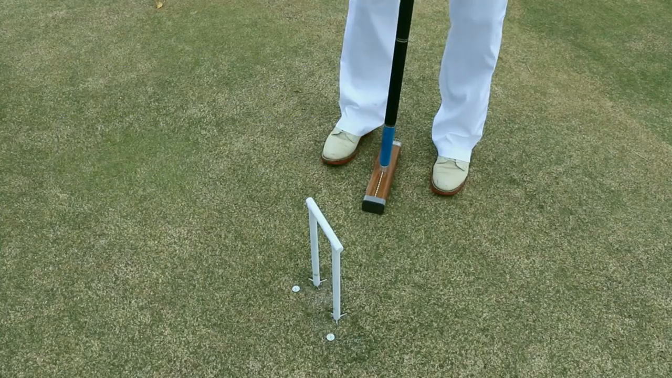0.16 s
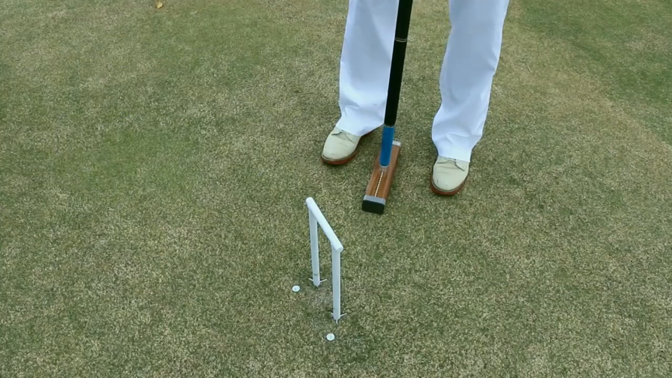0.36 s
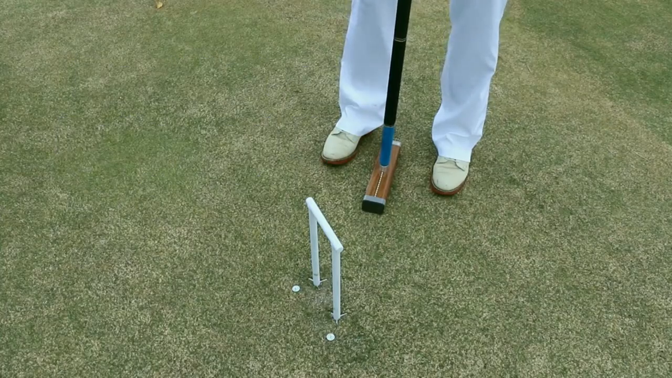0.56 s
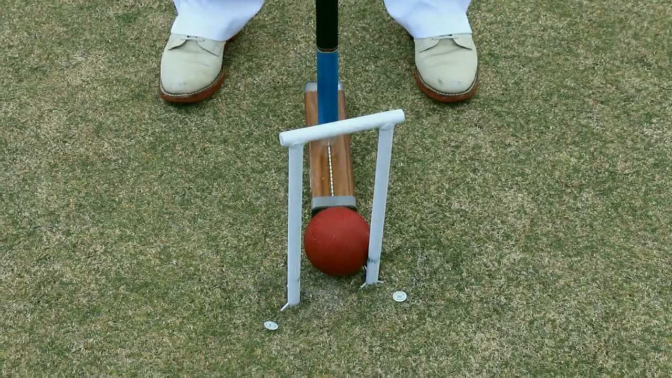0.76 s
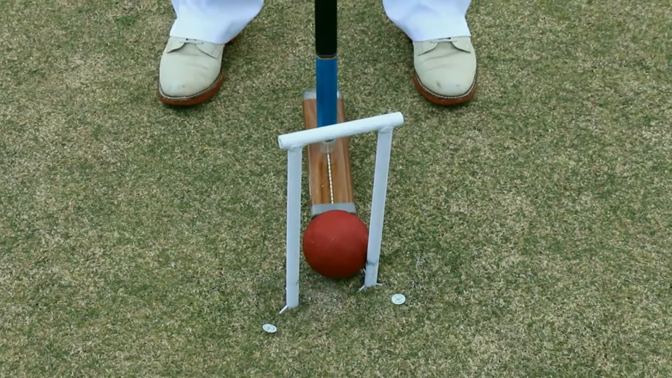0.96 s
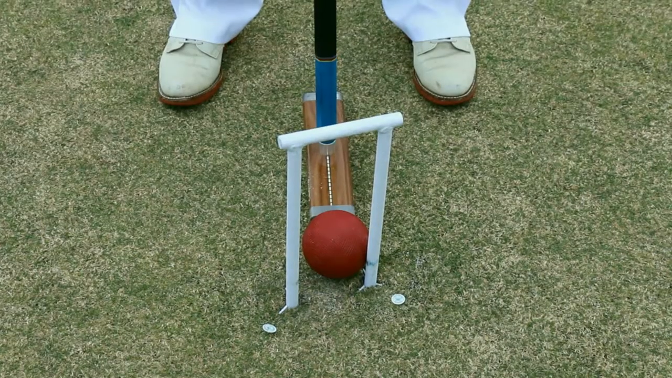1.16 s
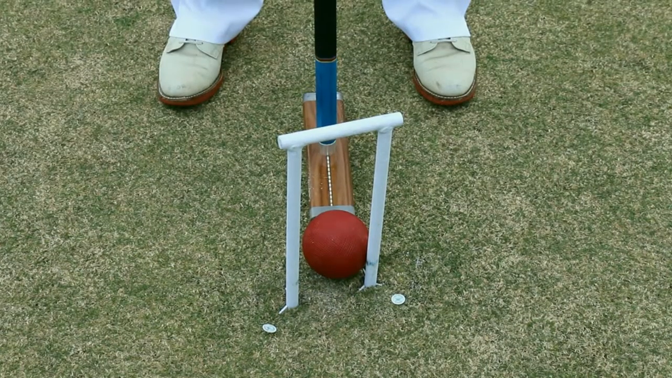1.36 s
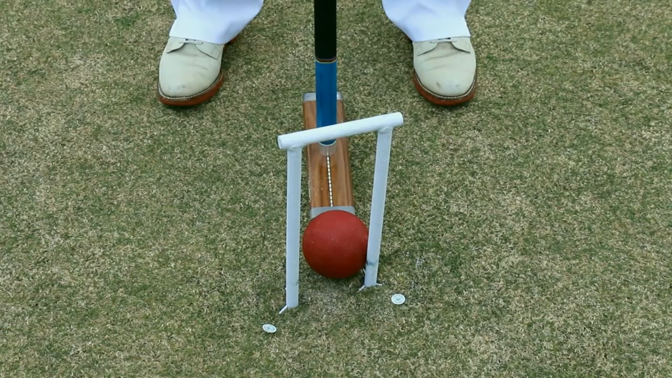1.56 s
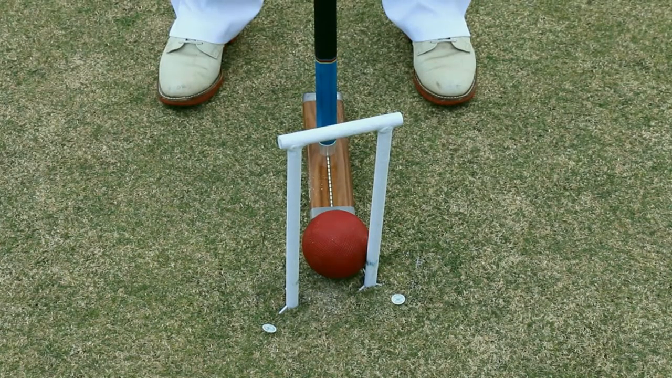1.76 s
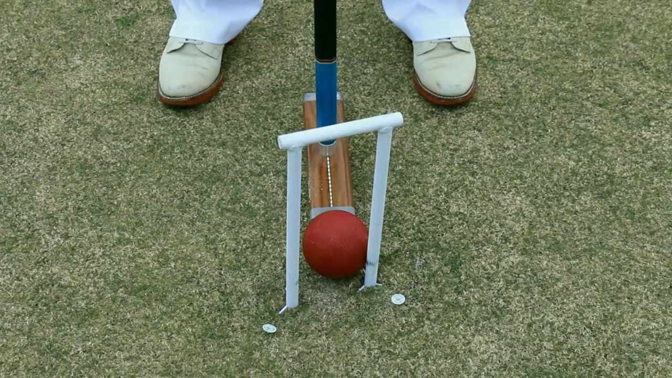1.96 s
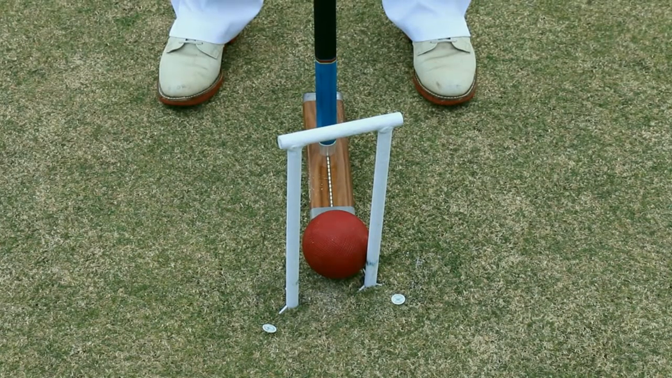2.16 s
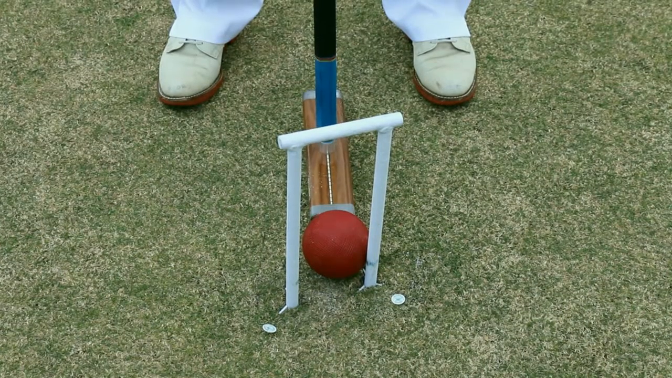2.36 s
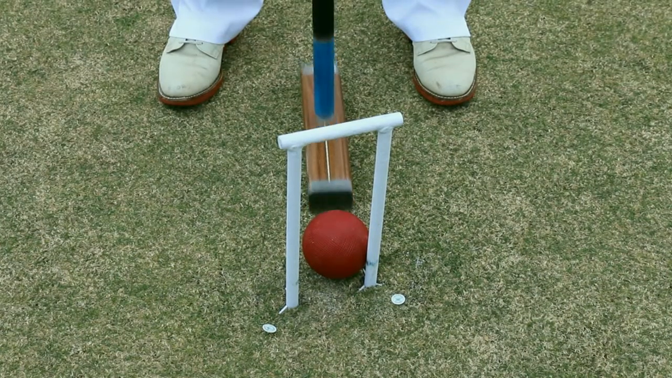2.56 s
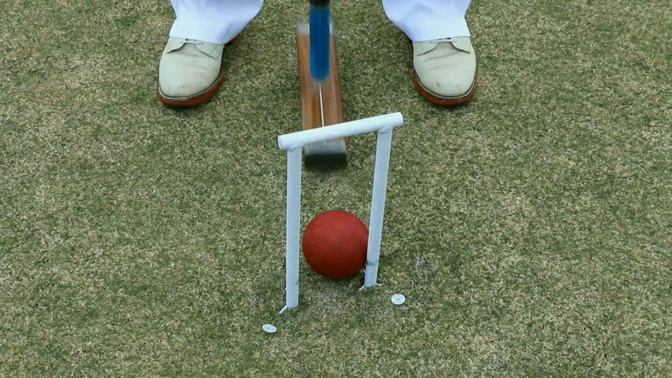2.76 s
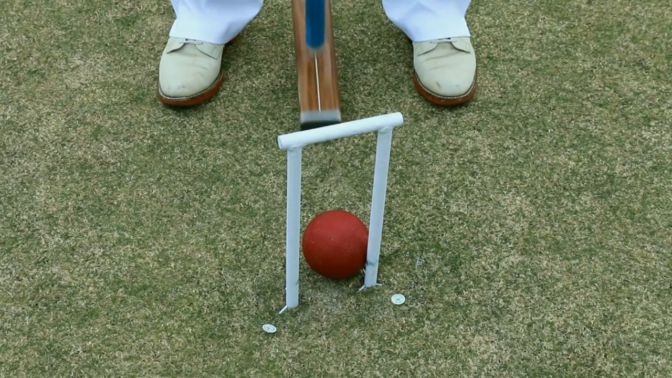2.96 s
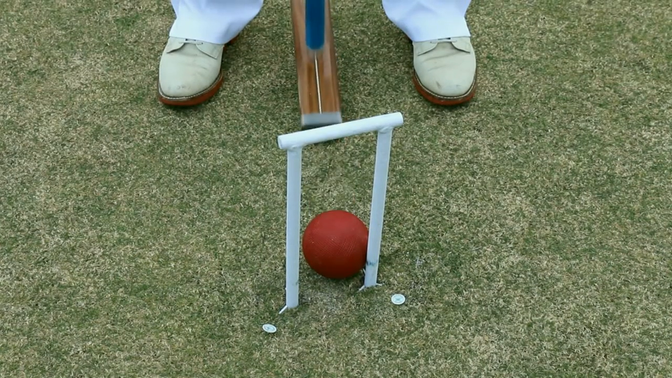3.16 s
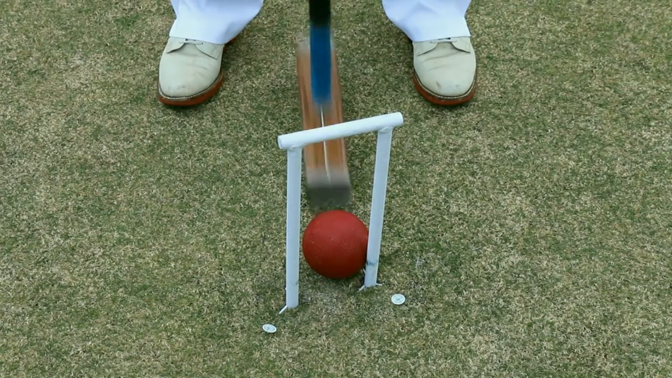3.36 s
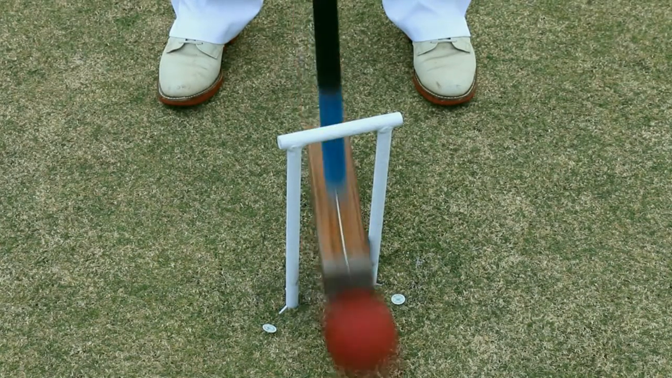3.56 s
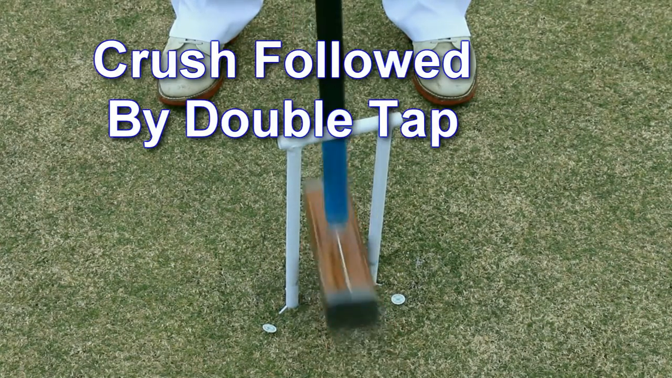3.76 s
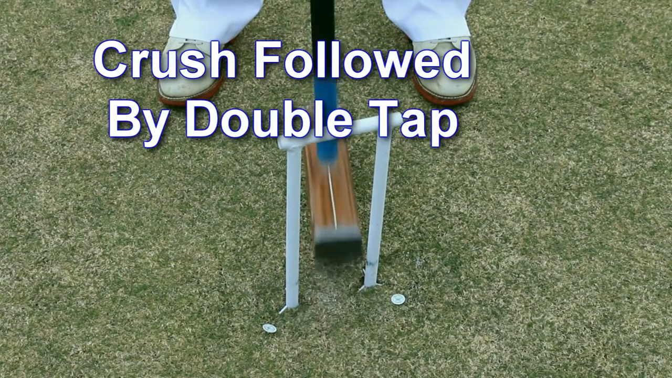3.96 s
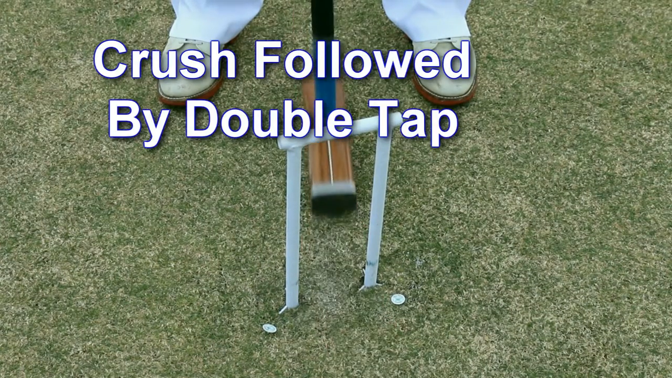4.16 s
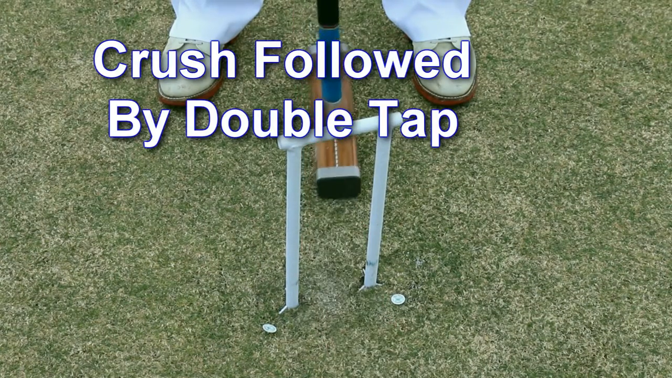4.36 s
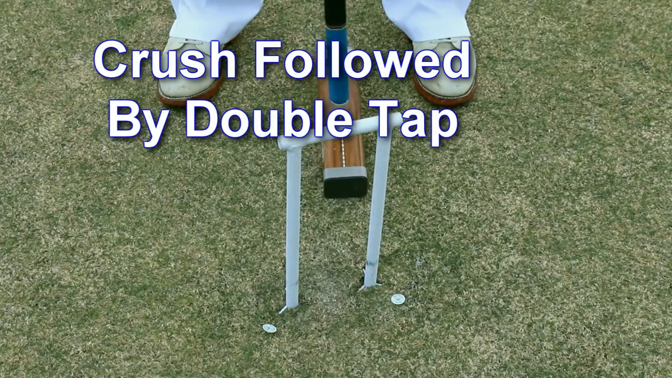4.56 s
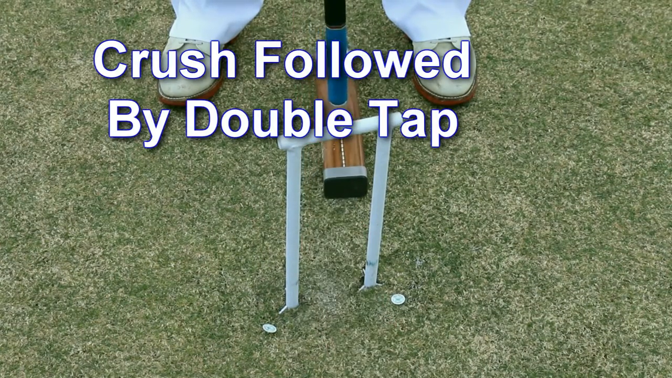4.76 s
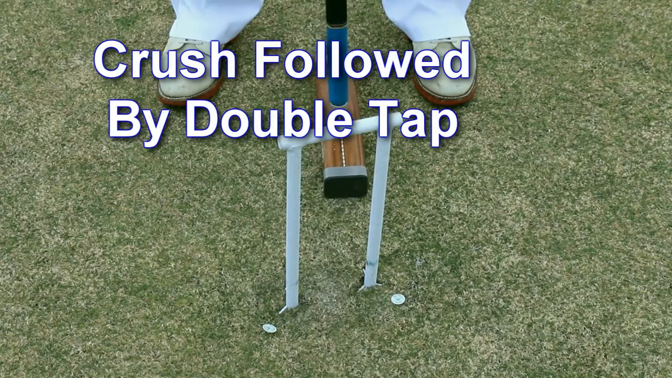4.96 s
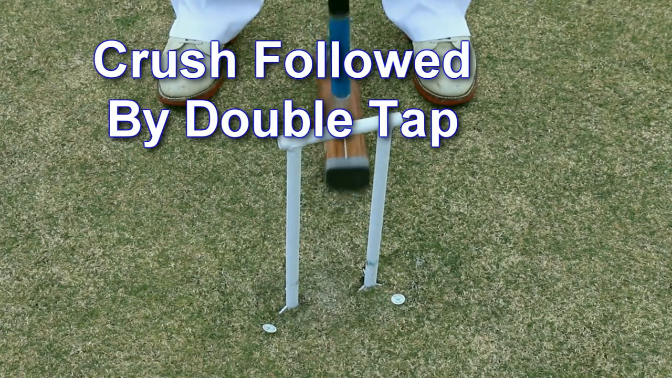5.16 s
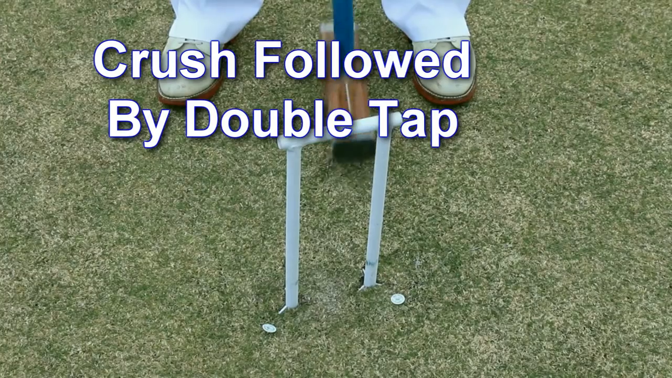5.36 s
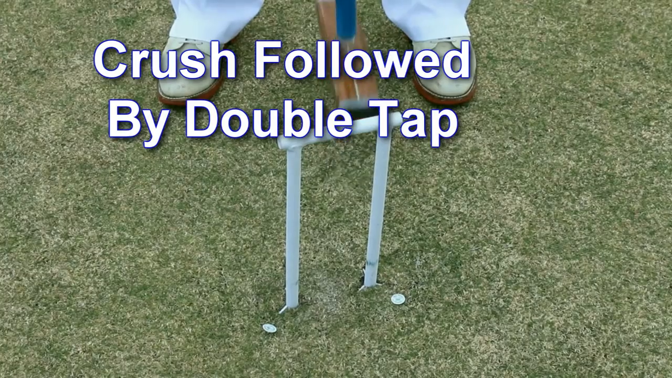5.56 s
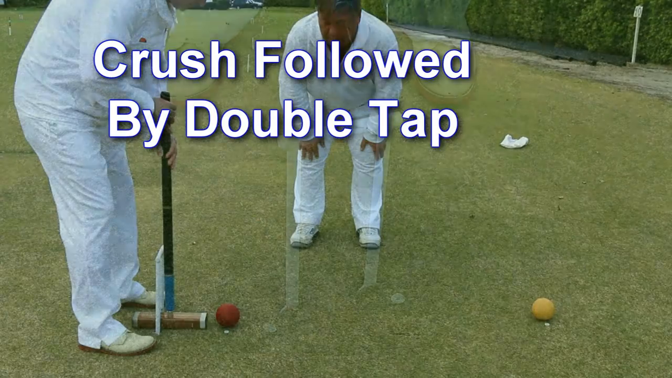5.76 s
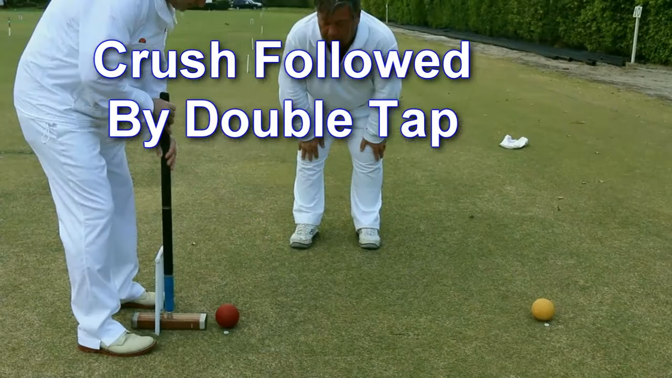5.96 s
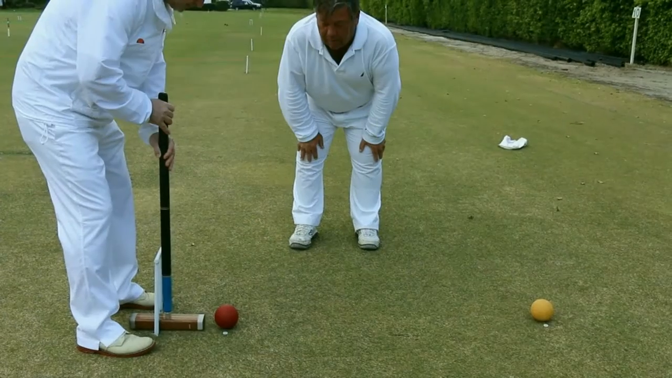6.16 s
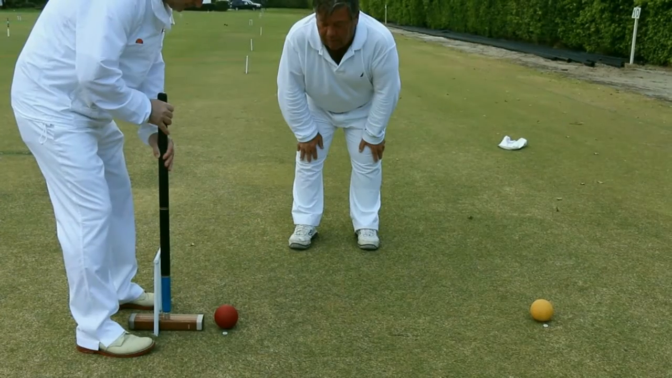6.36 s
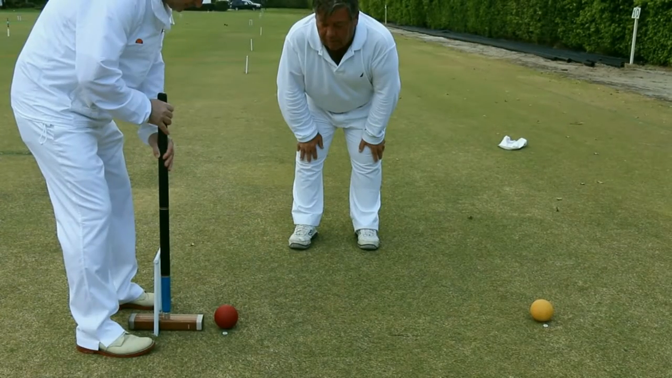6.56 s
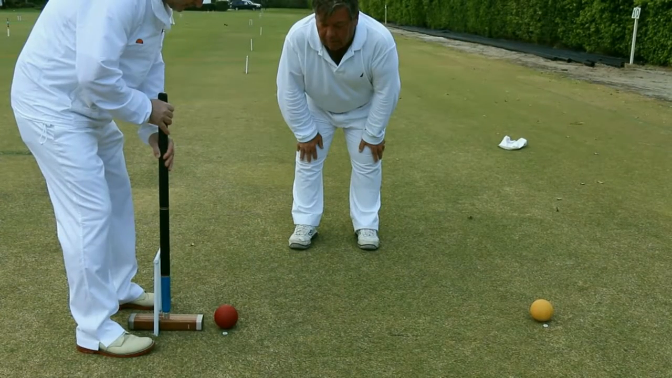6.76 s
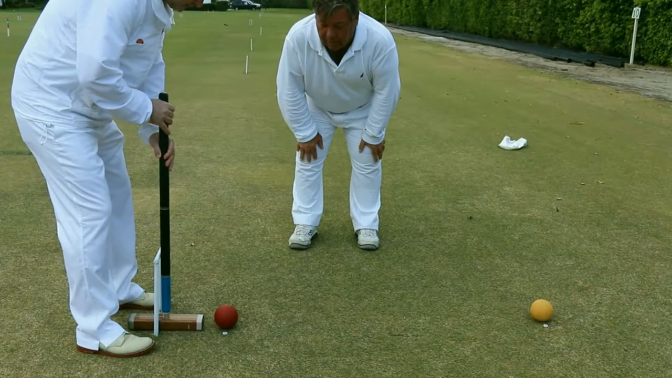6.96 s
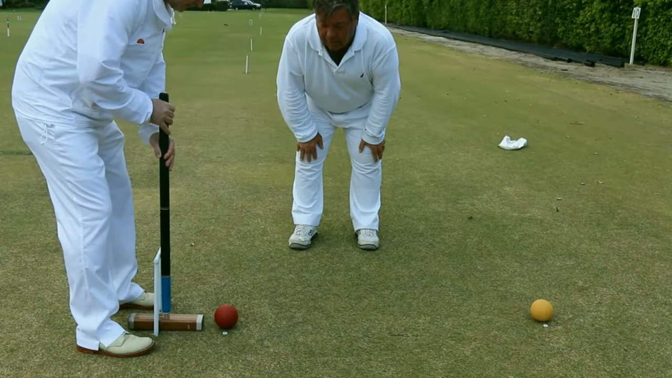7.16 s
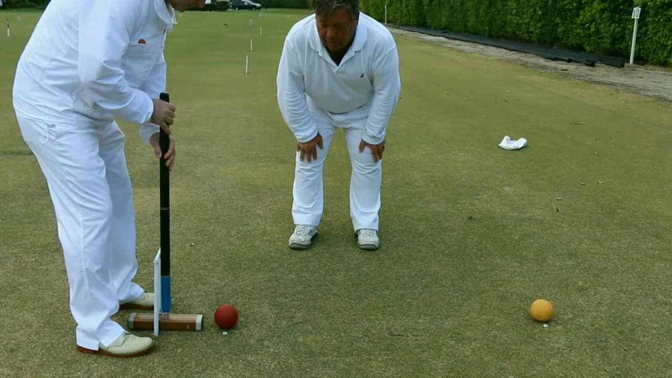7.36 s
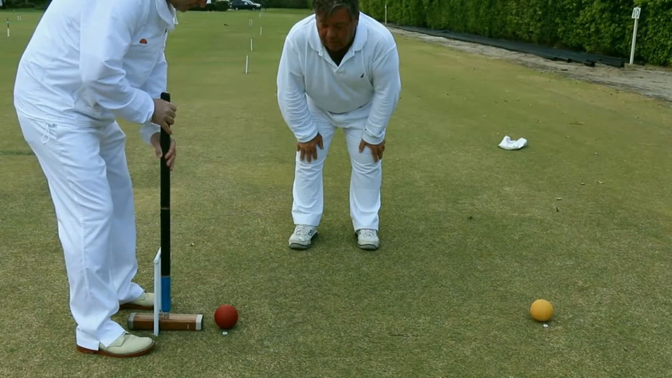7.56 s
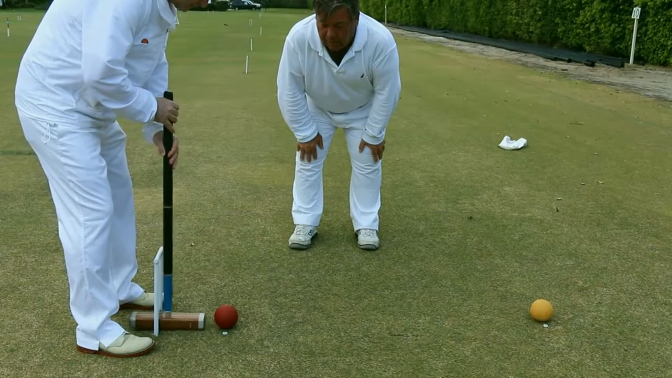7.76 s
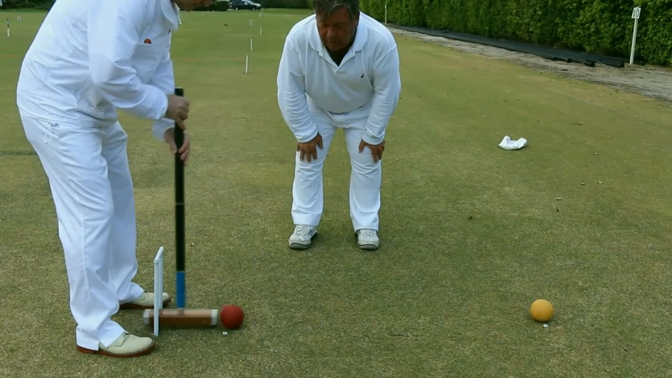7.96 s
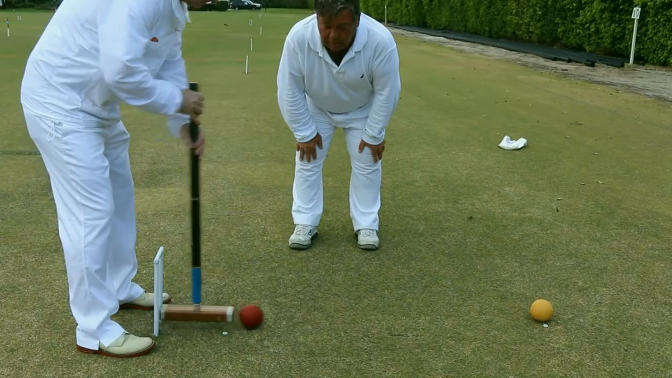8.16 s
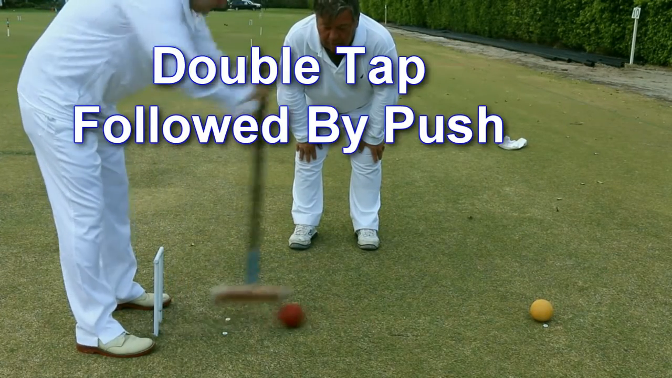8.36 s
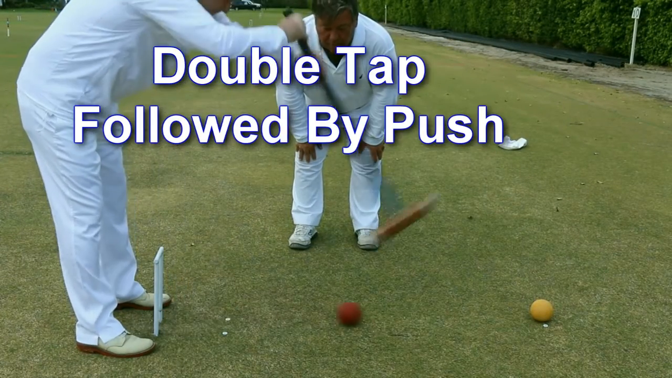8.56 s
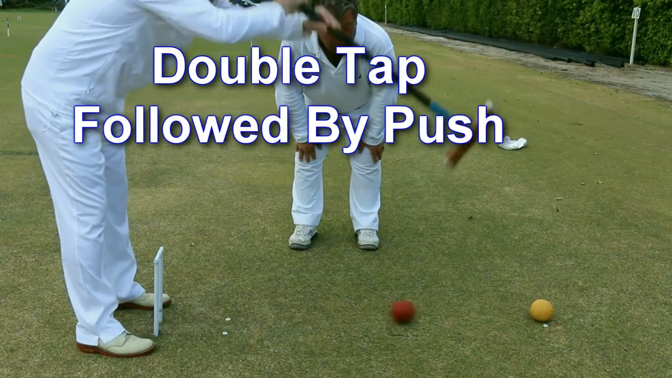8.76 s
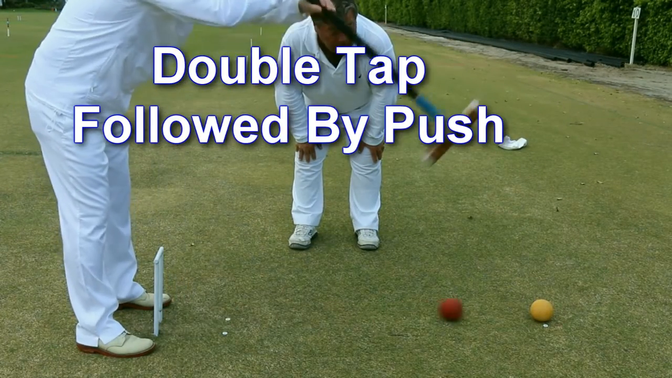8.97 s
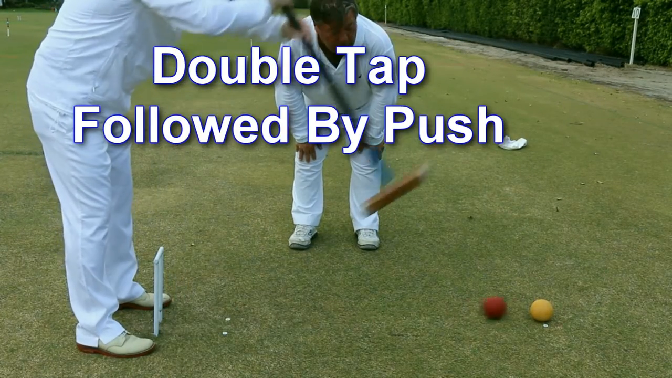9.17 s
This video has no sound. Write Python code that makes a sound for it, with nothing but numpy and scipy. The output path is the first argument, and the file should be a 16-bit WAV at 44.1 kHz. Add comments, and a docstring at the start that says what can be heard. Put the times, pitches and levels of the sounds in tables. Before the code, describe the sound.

Outdoors on an open lawn, soft distant traffic swells gently under high hiss and a thin, wavering whine around 3 kHz. Short high whistles flick at 0, 0.5, 1.1, 1.8 and 2.6 s, louder on the left, among hoarse little chips. At 3.5 s a mallet strikes a ball: a very loud, dry wooden crack, overloaded, made of four contacts within 0.05 s, with a short hoop ring and slap. A rapid trill overlaps it to 4 s. A faint engine hum and soft coo follow, a sharp chip at 4.95 s, then a longer slowing trill from 6.0 to 7.1 s. Whistles glide at 5.7, 6.9 and 8.1 s. Rumble, hum and hiss switch on at 7.85 s; knocks at 8.01 and 8.22 s ring brightly, a weak contact at 8.3 s, with low thumps and turf scuffs. The added rumble stops at 8.67 s, leaving traffic and a chip at 9.1 s.

```python
"""Two wooden strokes crack and ring on an open lawn, each in several quick contacts, over far traffic.
A mallet drives a ball through a metal hoop: a jerk sounds wood and hoop modes, and noise slaps trail behind.
Traffic is coloured noise with a thin wavering whine; birds whistle and coo as gliding near-sines, trill in
falling chirps and chip in narrow noise; around the second stroke an added background of low rumble, hum and
hiss starts and stops abruptly, with ringing low thumps."""
import sys
import numpy as np
from scipy import signal
from scipy.fft import rfft, irfft, next_fast_len
from scipy.io import wavfile

SR = 44100
rng = np.random.default_rng(int(sys.argv[2]) if len(sys.argv) > 2 else 0)


def magnitude_from_level(level_db):
    """Linear magnitude for a level in decibels (20 dB per decade)."""
    exponent = np.asarray(level_db, float) / 20
    return 10 ** exponent


def int16_out(signal):
    """Quantize to a 16-bit WAV file."""
    q = np.round(np.clip(np.atleast_2d(signal).T, -1, 1) * 32767)
    wavfile.write(sys.argv[1], SR, q.astype(np.int16))


N = 406602
LEFT_LAG_S = 0.0004064   # far sounds reach the left ear later


def rms_one(x):
    """Scale to rms 1."""
    return x / np.sqrt(np.mean(x ** 2) + 1e-20)


def peak_one(x):
    """Scale to peak 1."""
    return x / np.abs(x).max()


def level_curve(points):
    """Level in dB at every sample, in straight lines between (t/s, level/dB) points."""
    s, db = np.transpose(points)
    return np.interp(np.arange(N) / SR, s, db)


def at_hz(points, hz):
    """Read a spectrum on a log-frequency axis."""
    return np.interp(np.log(hz + 1), np.log(np.array(points)[:, 0]), np.array(points)[:, 1])


def drift(rate_hz):
    """Slow chance of spread 1."""
    r = np.exp(-2 * np.pi * rate_hz / SR)
    return rms_one(signal.lfilter([1], [1, -2 * r, r * r], rng.standard_normal(N + SR))[SR:])


def spell(s, length, edge_s):
    """0 to 1: on from s for length, with soft edges."""
    t = np.arange(N) / SR - s
    return np.clip(np.minimum(t, length - t) / edge_s + .5, 0, 1)


def noise(spectrum, wide=False, grains_per_s=SR):
    """Coloured noise of rms 1; wide noise is only partly alike in both ears and reaches the left later."""
    # likeness of the two ears: f/Hz, likeness/0-1
    likeness = [(60, 0.95), (150, 1), (400, 0), (1500, 0.12), (3000, 0.4), (6000, 0), (15000, 0)]
    size = next_fast_len(N)
    hz = np.arange(size // 2 + 1) * SR / size
    # sparse grains are separate echoes
    grains = rng.standard_normal((2, size)) * (rng.random(size) < grains_per_s / SR)
    mid, side = rfft(grains) * magnitude_from_level(at_hz(spectrum, hz))
    if not wide:
        return rms_one(irfft(mid, size)[:N])
    alike = np.clip(at_hz(likeness, hz), 0, 1)
    shared, apart = np.sqrt(1 + alike) * mid, np.sqrt(1 - alike) * side
    left = (shared + apart) * np.exp(-2j * np.pi * hz * LEFT_LAG_S)
    right = shared - apart
    return rms_one(irfft(np.array([left, right]), size)[:, :N])


def resonate(x, hz, width_hz):
    """One resonance, gain 1 on top."""
    r = np.exp(-np.pi * width_hz / SR)
    return signal.lfilter([(1 - r * r) / 2, 0, (r * r - 1) / 2], [1, -2 * r * np.cos(2 * np.pi * hz / SR), r * r], x)


def narrow(hz, width_hz, size=N):
    """Noise twice through one resonance: a wavering tone of rms 1."""
    return rms_one(resonate(resonate(rng.standard_normal(size), hz, width_hz), hz, width_hz))


def ringing(modes, t):
    """Dying sines after a unit click, from modes (f/Hz, level/dB, t60/s)."""
    return sum(magnitude_from_level(db - 60 * t / t60) * np.sin(2 * np.pi * hz * t) for hz, db, t60 in modes)


def add(out, s, x):
    """Mix x in at time s."""
    i = round(s * SR)
    out[i:i + len(x)] += x[:len(out) - i]


def from_afar(x, left_db):
    """Place a far source: later in the left ear, and left_db louder there than in the right."""
    late = np.interp(np.arange(N) - LEFT_LAG_S * SR, np.arange(N), x)
    return np.array([magnitude_from_level(left_db) * late, x])


def glide(length, start_hz, end_hz):
    """Corners (s, Hz) of a straight glide."""
    return [0, length], [start_hz, end_hz]


def flick(length, top_hz, held_hz):
    """Corners (s, Hz) of a flick, drop, sagging hold and final lift."""
    flick_s, flick_hz, drop_s = 0.0133, 300, .028
    sag_hz, lift_s, lift_hz = 80, 0.018, 100
    sagged_hz = held_hz - sag_hz
    return ([0, flick_s, flick_s + drop_s, length - lift_s, length],
            [top_hz - flick_hz, top_hz, held_hz, sagged_hz, sagged_hz + lift_hz])


def whistles(calls, tune, swell, overtone_db, flutter_db, waver):
    """Near sines on a tune, with one overtone, swelling and fading while pitch wavers and level flutters."""
    out, flutter = np.zeros(N + SR), magnitude_from_level(flutter_db * drift(43))
    wavering = 1 + waver * drift(30)   # share of the pitch
    for s, length, db, first_hz, second_hz in calls:
        t = np.arange(0, length, 1 / SR)
        i = round(abs(s) * SR)
        hz = np.interp(t, *tune(length, first_hz, second_hz)) * wavering[i:i + len(t)]
        phase = 2 * np.pi * np.cumsum(hz) / SR
        shape = np.sin(np.pi * t / length) ** swell
        tone = np.sin(phase) + magnitude_from_level(overtone_db) * np.sin(2 * phase)
        add(out, 1 + s, np.sqrt(2) * magnitude_from_level(db) * shape * tone)   # one second of run-in
    return out[SR:] * flutter


def traffic():
    """Far roads: a drone and a tyre rush, both noise, swell as traffic nears, over a steady high hiss."""
    # rush as traffic nears: t/s, level/dB
    swells = [(0, -54), (.76, -53.5), (1.12, -54.5), (1.9, -53.5), (3.45, -54), (3.75, -53.5), (4.2, -55.5),
              (5.25, -55), (5.55, -52.5), (5.75, -54), (6.76, -55.5), (7.1, -53.5), (7.7, -54),
              (8.95, -55.5), (9.22, -54.5)]
    # low drone spectrum: f/Hz, level/dB
    drone = [(12, -49.5), (20, -28), (54, -2), (97, 1.5), (146, -1.5), (215, -10), (341, -13.5), (499, -15),
             (567, -11.5), (900, -14.5), (1170, -47.5), (1980, -120)]
    # tyre rush spectrum: f/Hz, level/dB
    rush = [(700, -39), (950, -18.5), (1100, -1.5), (1250, 2.5), (2050, -2.5), (2840, -5.5), (4000, -7),
            (6000, -20.5), (9000, -49)]
    # steady high hiss spectrum: f/Hz, level/dB
    air = [(1000, -29), (3000, -3), (5000, 0.5), (6500, -1.5), (8140, -4), (9300, -3), (11000, -7),
           (14800, -13), (16000, -16.5)]
    rush_db = level_curve(swells)
    drone_db = -63 + 0.6 * (rush_db - rush_db.mean())   # the drone follows part of the swing
    out = magnitude_from_level(drone_db + 1.4 * drift(1.6)) * noise([*drone, (2000, -65.0)], wide=True)
    out += magnitude_from_level(rush_db + 0.95 * drift(16)) * noise(rush, wide=True)
    return out + magnitude_from_level(-62.5) * noise(air, wide=True)


def whine():
    """A thin sine wavers in pitch and level, in spells over a faint rest level; narrow noise lines join it."""
    # spells of the whine: t/s, length/s, level/dB
    spells = [(.03, .08, -67), (1.374, 0.27, -61.5), (1.655, .03, -58), (1.82, .1, -61.5),
              (1.95, 0.11, -62.5), (2.08, .13, -62.5), (2.256, 0.11, -62.5), (2.42, 0.19, -61.5),
              (2.637, 0.23, -64), (2.877, 0.052, -61), (3.0, 0.3, -68), (3.68, 0.063, -62),
              (5.1, .11, -66.5), (5.58, 0.061, -61), (6.837, 0.21, -61.5), (7.42, .08, -67),
              (7.802, .6, -67), (8.452, 0.71, -66)]
    # steady faint thin tones: f/Hz, level/dB
    faint_lines = [(2650, -74.5), (8979, -78), (9340, -80.5)]
    whine_hz, rest_db, edge_s = 2870, -71.5, .015
    tone = np.sqrt(2) * np.sin(2 * np.pi * np.cumsum(whine_hz + 4.0 * drift(4.89)) / SR)
    level = np.max([magnitude_from_level(db) * spell(s, length, edge_s) for s, length, db in spells], axis=0)
    tones = np.maximum(level, magnitude_from_level(rest_db)) * magnitude_from_level(2.2 * drift(20.5)) * tone
    tones += sum(magnitude_from_level(db) * narrow(hz, 12.0) for hz, db in faint_lines)
    return from_afar(tones, left_db=-0.5)


def high_bird():
    """Whistles flick up, drop to a sagging held note and lift at the end, fluttered by the leaves."""
    # whistles: t/s, length/s, level/dB, top f/Hz, held f/Hz
    calls = [(-.09, .135, -63, 4600, 4290), (.48, 0.13, -57.5, 4740, 4270), (1.075, 0.12, -65, 4610, 4290),
             (1.81, 0.13, -56, 4640, 4265), (2.625, 0.12, -63, 4480, 4170)]
    song = whistles(calls, flick, swell=0.083, overtone_db=-40, flutter_db=3.0, waver=0.0046)
    return from_afar(song, left_db=9.0)


def chips():
    """Hoarse chips, chatter and soft rustles: noise in one resonance each, quick to rise and slower to fade."""
    # notes: t/s, level/dB, f/Hz, width/Hz, length/s
    notes = [(0.199, -59, 1500, 900, 0.19), (0.643, -53.5, 1510, 900, 0.21), (1.053, -55.5, 6420, 350, .07),
             (1.654, -59, 2600, 491, 0.12), (2.04, -52.5, 2670, 500, 0.024), (2.16, -53, 2620, 500, 0.026),
             (2.408, -54.5, 2520, 600, 0.056), (2.65, -63, 2180, 500, 0.14), (2.74, -54, 6500, 300, 0.074),
             (3.083, -57.5, 2560, 600, 0.22), (3.59, -65.5, 7000, 500, 0.15),
             (4.95, -45.5, 6200, 248.2, 0.041), (5.451, -55, 1760, 1490, 0.18), (5.594, -62, 6360, 60, 0.4),
             (5.783, -61.5, 4340, 201, 0.12), (6.761, -58.5, 2670, 100, 0.13),
             (6.998, -60, 4360, 303, 0.074), (7.346, -53, 6260, 920, 0.087),
             (9.143, -47.5, 6320, 198, 0.069)]
    out = np.zeros(N)
    for s, db, hz, width_hz, length in notes:
        t = np.linspace(0, 1, int(length * SR))
        shape = np.sin(np.pi * t ** 0.38) ** 0.57
        add(out, s, magnitude_from_level(db) * shape * narrow(hz, width_hz, size=SR // 2)[-len(t):])
    return from_afar(out, left_db=-3.0)


def engine():
    """A far engine note: a low gliding sine and its octave, wavering in pitch."""
    # notes: t/s, length/s, level/dB, start f/Hz, end f/Hz
    notes = [(1.3, 0.39, -66.5, 154, 158), (3.8, 1.6, -67, 108, 119.4), (5.4, 1.8, -70.5, 183, 177)]
    hum = whistles(notes, glide, swell=0.26, overtone_db=-16, flutter_db=1.5, waver=0.019)
    return from_afar(hum, left_db=-3.0)


def low_bird():
    """Straight gliding whistles with a clear octave swell and fade, fluttered by the leaves."""
    # whistles: t/s, length/s, level/dB, start f/Hz, end f/Hz
    calls = [(1.78, 0.14, -64.5, 2220, 2090), (5.66, 0.21, -59.5, 2334, 2190),
             (6.93, 0.16, -56.5, 2110, 2240), (8.12, .16, -50.5, 2240, 2134)]
    song = whistles(calls, glide, swell=0.21, overtone_db=-9.5, flutter_db=3.5, waver=.005)
    return from_afar(song, left_db=-2.0)


def trill_notes():
    """Rows (s, dB, throat Hz): two quick notes lead in, then each gap is a little longer."""
    # trills: first even note t/s, length/s, first gap/s, level/dB, throat f/Hz
    trills = [(3.4833, .48, .0555, -49, 3203), (6.087, 0.98, .0563, -46, 3455)]
    lead_gap_s, slowing_s, lead_throat_hz = .04, .00026, 3700
    arch_db = 2   # ends weaker than the middle
    notes = []
    for s, length, gap, db, hz in trills:
        k = np.arange(-2, 30)
        after = np.where(k < 0, k * lead_gap_s, k * gap + slowing_s * k ** 2)
        for a in after[after < length]:
            off_middle = 2 * max(a, 0) / length - 1
            notes.append((s + a, db - arch_db * off_middle ** 2, hz if a >= 0 else lead_throat_hz))
    return notes


def trill():
    """Falling chirps, coloured by two throat resonances and smeared by echoes from the hedge."""
    # hedge echoes: delay/s, level/dB
    echoes = [(.007, -5), (.012, -8), (.018, -11), (.027, -14.5), (.038, -13)]
    top_hz, fall_hz, note_s = 3900, 1151, 0.0074
    throat_db, low_throat_hz, low_throat_db, width_hz = 4, 2827, 7.5, 54
    out, t = np.zeros(N), np.linspace(0, 1, int(note_s * SR))
    for s, db, throat_hz in trill_notes():
        hz = top_hz * (1 + rng.normal(0, 0.01)) - fall_hz * t
        chirp = np.sin(np.pi * t) ** 0.38 * np.sin(2 * np.pi * np.cumsum(hz) / SR)
        chirp = np.pad(magnitude_from_level(db + rng.normal(0, 1.3)) * chirp, (0, SR // 50))   # room for the throat to ring
        note = magnitude_from_level(-4.0) * chirp
        note += magnitude_from_level(throat_db) * resonate(chirp, throat_hz + rng.normal(0, 60), width_hz)
        note += magnitude_from_level(low_throat_db + rng.normal(0, 0.99)) * resonate(chirp, low_throat_hz, width_hz)
        add(out, s, note)
        for delay, echo_db in echoes:
            add(out, s + delay + rng.normal(0, 0.001), magnitude_from_level(echo_db + rng.normal(0, 1.4)) * note)
    return out


def mallet_and_ball(t, contact_ms, ring_db):
    """The jerk of the contact sounds as one swing and rings the wood; a longer contact is duller."""
    # mallet head and ball modes: f/Hz, level/dB, t60/s
    wood = [(483.6, -22.5, 0.005), (735.4, -1.5, 0.017), (990, -6, 0.022), (1246, 2, 0.016),
            (1638, 4.5, 0.017), (2151, -1, 0.017)]
    phase = np.pi * np.clip(t * 1000 / contact_ms, 0, 1)
    jerk = np.sin(2 * phase) * np.sin(phase) ** .5
    ring = np.convolve(ringing(wood, t), jerk[:100])[:len(t)]
    return peak_one(jerk + magnitude_from_level(ring_db) * peak_one(ring))


def hoop(t, base_hz, base_t60, bright_db):
    """The metal hoop rings in modes at ratios of its lowest pitch; brightness lifts the upper ones."""
    # hoop modes: pitch ratio, level/dB, share of t60
    modes = [(1.0, 2, 0.94), (1.011, -1, 0.93), (1.325, -17.5, .7), (1.51, -10.5, .35), (1.665, -16.5, .6)]
    tuned = [(ratio * base_hz, db + bright_db * (k > 1), share * base_t60)
             for k, (ratio, db, share) in enumerate(modes)]
    return peak_one(ringing(tuned, t)) * (1 - np.exp(-t / .0006))


def crack(t):
    """A click through three resonances, with a little of its bare edge as air."""
    hz, width_hz, air_db = 3584, 1900, -25
    click = 1. * (t == 0)
    narrowed = resonate(resonate(click, hz, width_hz), hz, 2 * width_hz)
    return peak_one(resonate(narrowed, hz, 2 * width_hz)) + magnitude_from_level(air_db) * np.diff(click, prepend=0)


def slap_noises():
    """Noises of the tail: grainy slaps from turf and bodies, their spread, a bright clack and a lawn wash."""
    # slap spectrum: f/Hz, level/dB
    slap_spectrum = [(40, -14.5), (200, -11.5), (400, -6), (620, -3), (820, -3), (1300, -7.5),
                     (2200, -20.5), (4800, -32), (6500, -29.5), (15000, -49.5)]
    # dull lawn wash spectrum: f/Hz, level/dB
    lawn_spectrum = [(40, -13.5), (120, -3), (400, 0), (1000, -1), (1600, -7), (3000, -28.5), (15000, -70)]
    clack_hz, clack_width_hz, slap_cut_hz = 4630, 1400, 2600
    slap, spread = noise(slap_spectrum, grains_per_s=4000), noise(slap_spectrum)
    clack = resonate(resonate(slap, clack_hz, clack_width_hz), clack_hz, clack_width_hz)
    # grass dulls the slaps
    slap, spread = signal.lfilter(*signal.butter(2, slap_cut_hz, fs=SR), [slap, spread])
    return slap, spread, clack, noise(lawn_spectrum)


def knocks():
    """Each contact sums wood, crack and hoop; slaps and a longer, smooth lawn wash die away behind it."""
    # contacts: t/s, peak level/dB, contact/ms, hoop ring level/dB and slap tail level/dB re the peak
    contacts = [(3.528, -25, 2.3, -40, 0.5), (3.541, 4.5, 0.51, -21, -37),
                (3.5624, -16.5, 1.06, -37.5, -12.5), (3.5709, -6, 0.69, -22, -36),
                (8.0129, -3.5, 1.08, -16, -22.5), (8.2153, -10, 1.13, -15.5, -21.5),
                (8.299, -28, 1.6, -12, -16.5)]
    # first swing of each contact: push or pull/+1 or -1
    swings = [1, -1, 1, -1, 1, 1, -1]
    # the two strokes, at different hoops: hoop f/Hz, hoop t60/s, brightness/dB, wood ring level/dB, tail t60/s
    strokes = [(3414, .055, -9, 0.5, 0.11), (3240, 0.11, 5.5, 1, .2)]
    # inverted echoes of the body at the second hoop: delay/s, level/dB
    near_echoes = [(.0068, -13.5), (.0093, -12)]
    second_stroke_s, body_cut_hz = 6, 3200
    lawn_db, lawn_longer = -9.5, 1.8
    out, t = np.zeros((2, N)), np.arange(SR // 3) / SR
    slap, spread, clack, lawn = slap_noises()
    crack_shape = crack(t)
    hardest_db = contacts[1][1]
    for swing, (s, peak_db, contact_ms, hoop_db, tail_db) in zip(swings, contacts):
        second = int(s > second_stroke_s)
        hoop_hz, hoop_t60, bright_db, wood_db, t60 = strokes[second]
        wood = swing * mallet_and_ball(t, contact_ms, wood_db)
        direct = signal.lfilter(*signal.butter(2, body_cut_hz, fs=SR), wood)
        # harder blows crack more, and half of the brightness goes into the crack
        crack_db = -8 + 1.2 * np.maximum(peak_db - hardest_db, -7.0) + 0.5 * bright_db
        body = direct - swing * magnitude_from_level(crack_db) * crack_shape
        body += magnitude_from_level(hoop_db) * hoop(t, hoop_hz, hoop_t60, bright_db)
        if second:
            for delay, echo_db in near_echoes:
                lag = round(delay * SR)
                body[lag:] -= magnitude_from_level(echo_db) * direct[:-lag]
        now = slice(round(s * SR), round(s * SR) + len(t))
        dying = magnitude_from_level(tail_db - 60 * t / t60) * (1 - np.exp(-t / 0.0014))
        wash = magnitude_from_level(tail_db + lawn_db - 60 * t / (lawn_longer * t60)) * (1 - np.exp(-t / 0.012)) * lawn[now]
        for ear, sign in enumerate((1, -1)):
            slaps = slap + magnitude_from_level(6.5 + bright_db) * clack + sign * magnitude_from_level(-17) * spread
            add(out[ear], s, magnitude_from_level(peak_db) * (body + dying * slaps[now] + wash))
    return out


def dove():
    """A soft coo: a low sine gliding up, swelling and fading, fluttered by the leaves."""
    # coos: t/s, length/s, level/dB, start f/Hz, end f/Hz
    calls = [(4.06, 0.628, -70.5, 531, 565)]
    coo = whistles(calls, glide, swell=0.47, overtone_db=-35, flutter_db=5.5, waver=0.011)
    return from_afar(coo, left_db=-2.0)


def abrupt_background():
    """Low noise rumble, wavering hum and steady hiss start and stop abruptly; thumps are dying low sines."""
    # rumble level: t/s, level/dB
    rumble_level = [(7.85, -40), (7.95, -42), (8.05, -44.5), (8.12, -49), (8.18, -40), (8.3, -37),
                    (8.4, -46), (8.54, -40.5), (8.65, -46.5)]
    # rumble spectrum: f/Hz, level/dB
    rumble = [(20, -17), (35, -8.5), (60, -3.5), (95, -4.5), (125, -13), (160, -34), (400, -35.5),
              (1000, -57), (15000, -99)]
    # hiss spectrum: f/Hz, level/dB
    hiss = [(150, -16), (500, -3), (1000, 1), (4000, -6), (9000, -11.5), (15000, -17)]
    # ringing thumps: t/s, level before the soft rise/dB, f/Hz
    thumps = [(8.225, -9.5, 90.8), (8.3, -18.5, 91.5), (8.358, -23.5, 93), (8.423, -23, 93.4),
              (8.513, -27.5, 72.5)]
    from_s, to_s, edge_s = 7.853, 8.672, .015
    hum_hz, hum_db, hiss_db = 221, -59.5, -59.5
    thump_t60_s, thump_rise_s = 0.1, 0.0078
    present = spell(from_s, to_s - from_s, edge_s)
    hum = np.sqrt(2) * np.sin(2 * np.pi * np.cumsum(hum_hz + 2.1 * drift(6)) / SR)
    out = present * (magnitude_from_level(level_curve(rumble_level)) * noise(rumble) + magnitude_from_level(hum_db + drift(8)) * hum)
    t = np.arange(SR // 2) / SR
    for s, db, hz in thumps:
        dying = magnitude_from_level(db - 60 * t / thump_t60_s) * (1 - np.exp(-t / thump_rise_s))
        add(out, s, dying * np.sin(2 * np.pi * hz * t))
    return out + present * magnitude_from_level(hiss_db) * noise(hiss, wide=True)


def scuffs():
    """The ball scuffs the turf: short soft bursts of rough friction noise, answered by the hoop."""
    # scuffs: t/s, level before the soft rise/dB, length/s
    bursts = [(8.295, -46, 0.06), (8.395, -45.5, 0.085), (8.492, -50, 0.057), (8.61, -60, 0.11)]
    # friction spectrum: f/Hz, level/dB
    spectrum = [(500, -10), (1500, 4), (3400, 3.5), (5400, 1), (8000, -16), (15000, -26)]
    # the hoop answers: f/Hz, width/Hz, level/dB
    rattle = [(1740, 100, 1), (3420, 200, -1), (5400, 210, -7)]
    shape = np.zeros(N)
    for s, db, length in bursts:
        t = np.arange(int(3 * length * SR)) / (length * SR)
        add(shape, s, magnitude_from_level(db - 11.6 * t) * (1 - np.exp(-t * 12)))
    friction = shape * noise(spectrum) * magnitude_from_level(1.7 * drift(170))
    answer = sum(magnitude_from_level(db) * resonate(friction, hz, width_hz) for hz, width_hz, db in rattle)
    return magnitude_from_level(-5) * friction + answer


def post():
    """The last contact sets a post ringing: one dying sine."""
    out, t = np.zeros(N), np.arange(SR // 3) / SR
    add(out, 8.299, (1 - np.exp(-t / .0006)) * ringing([(1740, -37.5, 0.12)], t))   # s; Hz, dB, t60 s
    return out


def scene():
    """Near sounds and the trill in the middle, far ones spread."""
    far = traffic() + whine() + high_bird() + chips() + engine() + low_bird() + dove()
    return far + trill() + knocks() + abrupt_background() + scuffs() + post()


def low_pass(x):
    """Removes everything above the highest recorded frequency."""
    return signal.sosfilt(signal.butter(12, 16610, fs=SR, output="sos"), x)


def record(dry):
    """The hardest knock overloads and clips at full scale."""
    return low_pass(np.clip(dry, -1, 1))


dry = scene()
out = record(dry)
int16_out(out)
```